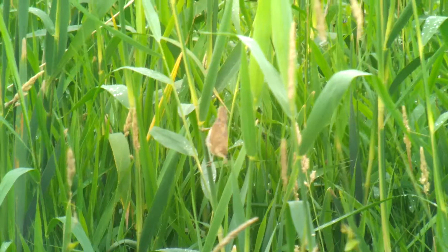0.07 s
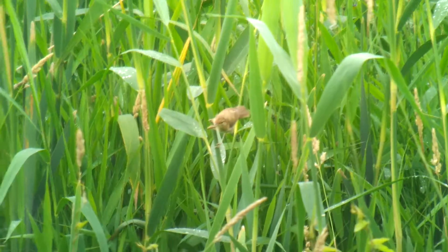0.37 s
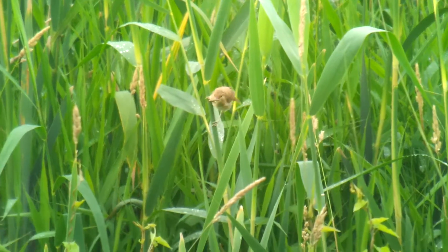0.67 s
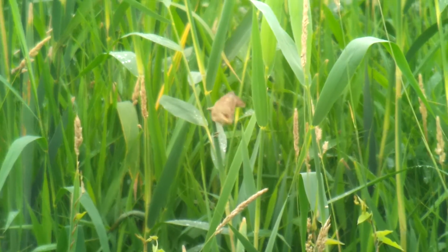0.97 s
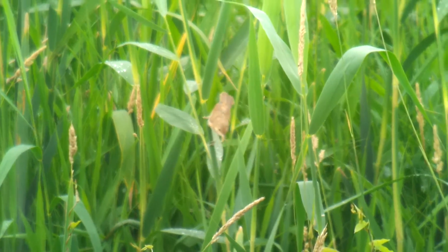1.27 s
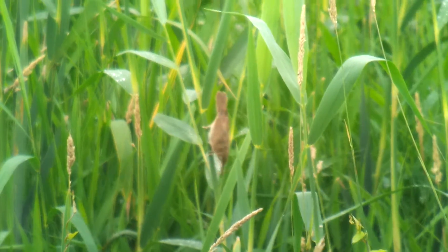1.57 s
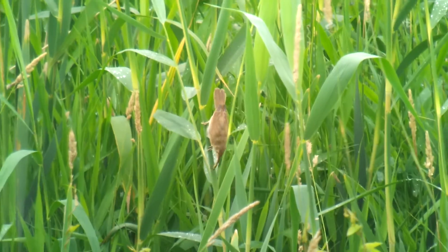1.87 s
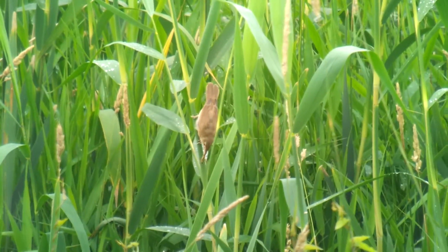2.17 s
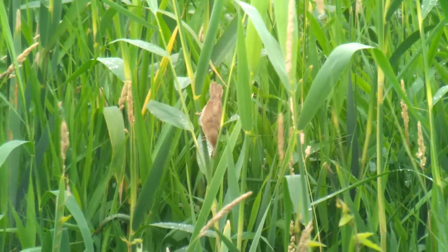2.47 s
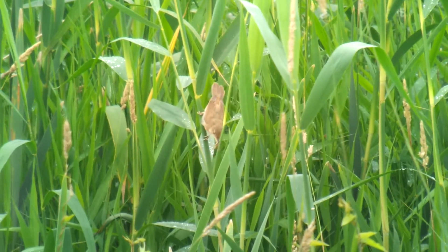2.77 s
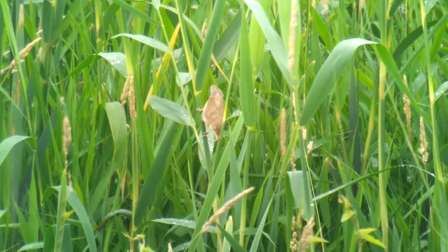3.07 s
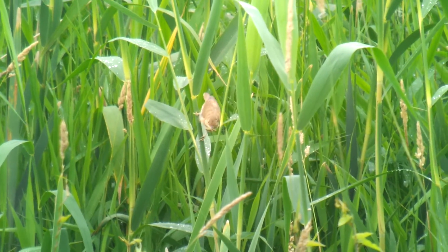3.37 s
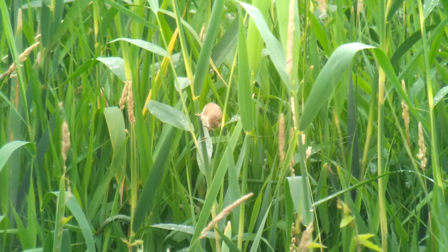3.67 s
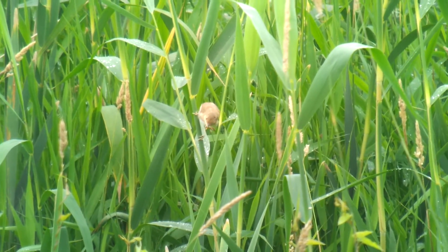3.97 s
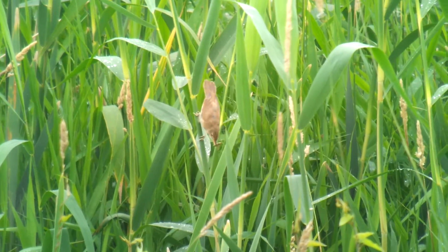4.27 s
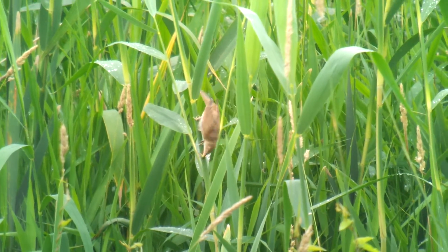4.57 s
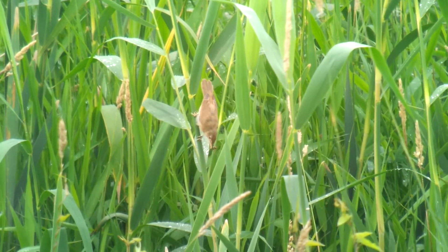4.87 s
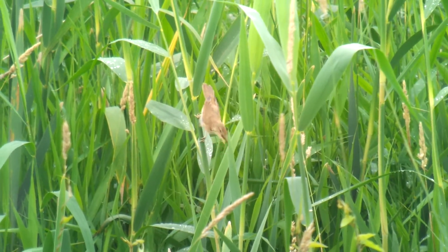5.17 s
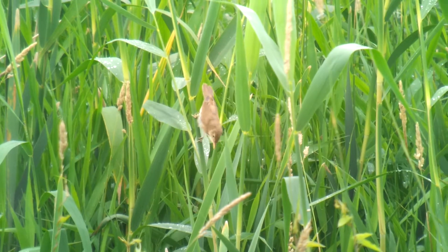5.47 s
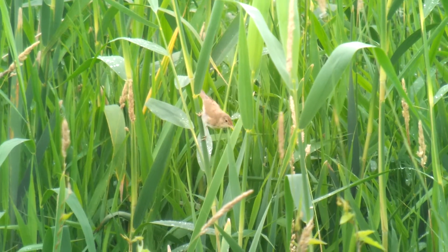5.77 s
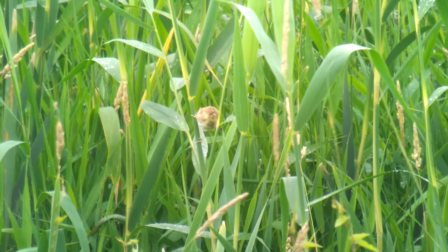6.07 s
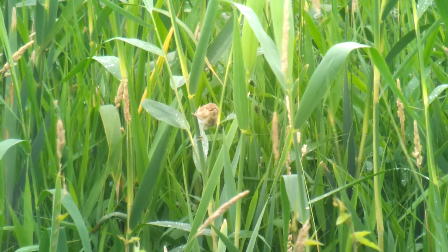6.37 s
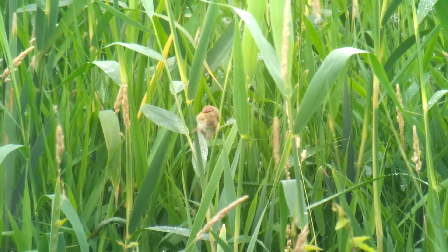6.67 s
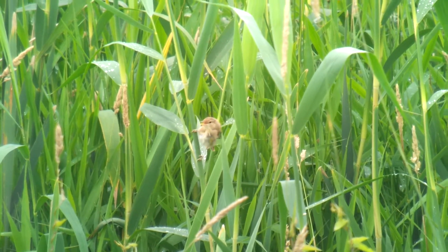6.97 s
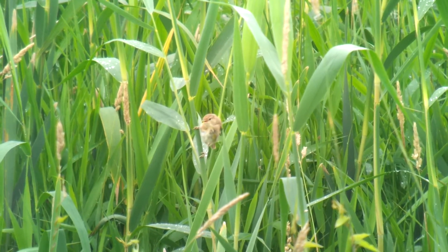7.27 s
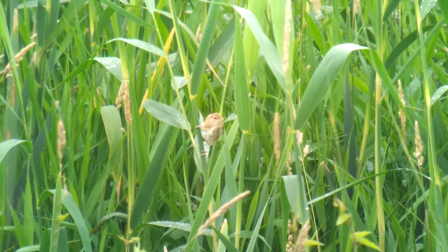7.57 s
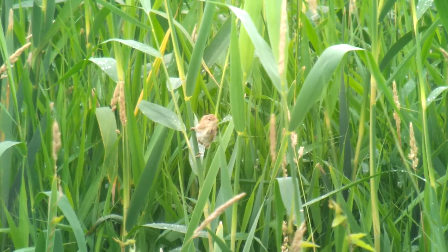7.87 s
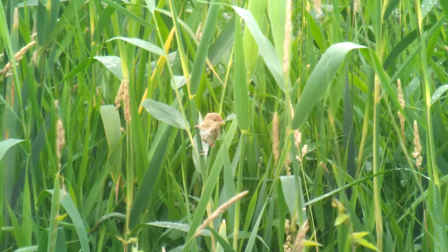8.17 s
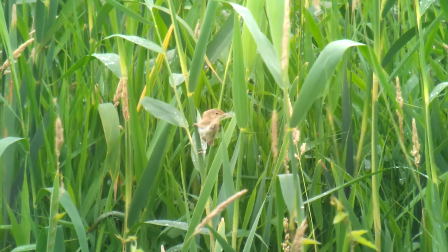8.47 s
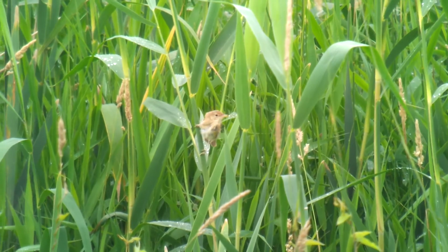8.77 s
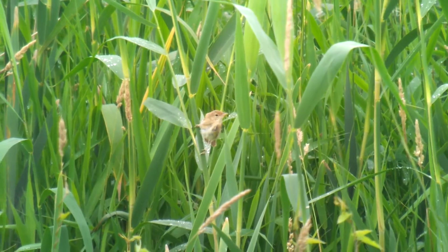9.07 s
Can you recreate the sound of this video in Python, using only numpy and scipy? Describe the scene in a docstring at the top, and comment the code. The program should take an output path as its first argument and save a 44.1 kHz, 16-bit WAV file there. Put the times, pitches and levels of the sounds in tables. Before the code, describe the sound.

A warbler sings a fast, scratchy jumble of chirps, swooping whistles and rattling trills in dense reeds, fading in after a moment of silence. Behind it are thin twitters from distant birds, an even open-air hiss, a slight wind rumble and the faint low hum of a faraway engine. Two tiny, sharp stem cracks stand out, one early and one halfway through. The mono sound is soft, with the singer nearest.

```python
"""A reed warbler chatters in a dense reed bed: whistles, chips, slurs, sawtooth trills and rasps overlap.
Each note is a near-pure syrinx tone swept in pitch; a second vibration shakes it into a rasp.
Farther birds twitter. The reeds hiss and scatter the song, wind rumbles faintly, a distant engine
hums and dry stems snap. Mono, fading in after a short silence."""
import sys
import numpy as np
from scipy import signal
from scipy.fft import rfft, irfft, next_fast_len
from scipy.io import wavfile
from scipy.ndimage import map_coordinates

SR = 44100
rng = np.random.default_rng(int(sys.argv[2]) if len(sys.argv) > 2 else 0)


def digitize_waveform(pressure):
    """Quantize a signal to 16-bit integers and store it at the path in sys.argv[1].

    Rows of a 2-D input are taken as channels; values are limited to [-1, 1].
    """
    field = np.atleast_2d(pressure).T
    bounded = np.clip(field, -1, 1)
    quanta = np.round(bounded * 32767).astype(np.int16)
    wavfile.write(sys.argv[1], SR, quanta)


N = 401751

# reed and open-air hiss: freq_hz, relative_density_db
HISS_SPECTRUM = [(50, -28), (115, -0.5), (155, -3.5), (195, 1.5), (260, -2), (430, -1.5), (620, -5),
                 (880, -3.5), (1200, -10.5), (1700, -6.5), (2300, -15), (4200, -15.5), (8000, -16.5),
                 (12000, -19)]
# wind rumble: freq_hz, relative_density_db
WIND_SPECTRUM = [(10, -9), (22, -7.5), (40, 1.5), (70, 0), (100, -4), (300, -68)]
# wind strength: time_s, level_db
WIND_LEVELS = [(1, -54), (2.9, -57.5), (3.65, -48), (4.2, -58), (7.7, -56), (8.3, -54), (9.1, -57)]
# distant engine: time_s, firing_hz, level_db
ENGINE_CURVE = [(1, 64, -54.5), (1.3, 65, -56), (1.9, 67, -49.5), (2.5, 69, -49), (2.85, 72, -61),
                (3.9, 73, -59.5), (9.1, 74, -66)]
# dry stems cracking: start_s, level_db
STEM_SNAPS = [(.798, -27), (4.5567, -26)]
# low calls: start_s, pitch_hz, level_db, trail_db
LOW_CALL_NOTES = [(1.017, 2586, -49, -58), (2.272, 2660, -51.5, -58)]
# falling slurs: start_s, length_s, end_hz, level_db
FALLING_SLURS = [(1.039, .025, 2780, -58), (1.137, 0.02, 2800, -56), (1.187, 0.063, 2890, -58.5),
                 (1.425, 0.093, 2714, -51), (2.33, 0.016, 3450, -50), (2.47, .014, 3180, -56),
                 (2.508, 0.017, 3000, -55), (2.702, 0.079, 2800, -54), (3.368, 0.011, 3080, -56),
                 (4.338, .016, 2950, -58), (5.697, 0.027, 3230, -53), (5.938, .041, 5320, -56),
                 (6.443, 0.059, 2545, -58), (6.668, 0.05, 2830, -54), (6.701, 0.062, 2790, -54.5),
                 (6.838, 0.034, 2390, -59), (6.687, .04, 4600, -56.5), (7.026, .013, 3230, -50.5),
                 (7.072, .048, 5390, -56.5), (7.163, .014, 3210, -54), (7.58, 0.071, 2340, -56),
                 (7.96, .05, 2550, -57.5), (8.15, 0.027, 2680, -57.5), (8.552, .018, 3620, -58),
                 (8.992, 0.044, 5400, -57.5)]
# rising slurs: start_s, length_s, end_hz, level_db
RISING_SLURS = [(1.235, .048, 3320, -57.5), (1.323, 0.046, 3030, -49), (1.821, .033, 7300, -54),
                (1.835, .025, 6100, -54), (2.037, .014, 3450, -56), (2.155, 0.016, 3450, -55),
                (2.59, 0.037, 3070, -53), (5.046, .018, 4280, -57.5), (6.09, 0.0065, 5650, -44.5),
                (7.3, 0.042, 2610, -57), (8.014, 0.047, 2860, -57.5), (8.093, 0.032, 5100, -51),
                (8.512, 0.056, 2790, -58)]
# held notes, sagging slightly: start_s, length_s, pitch_hz, level_db
HELD_NOTES = [(2.645, .035, 4335, -56), (3.871, 0.045, 4160, -56.5), (4.381, .05, 2810, -61),
              (4.806, .045, 4150, -61), (5.295, 0.075, 3360, -58), (5.425, 0.038, 4360, -53.5),
              (5.55, 0.058, 2826, -57), (6.659, 0.03, 4140, -49.5), (7.441, .25, 2800, -64),
              (8.288, 0.032, 3320, -52), (8.368, 0.077, 2110, -60), (8.447, 0.059, 4220, -56),
              (8.732, .13, 2820, -62)]
# scratchy notes: start_s, length_s, pitch_hz, level_db
RASP_NOTES = [(3.469, .04, 6630, -56.5), (5.684, 0.013, 6100, -50), (5.703, 0.013, 6070, -49),
              (5.957, 0.057, 3740, -55.5), (6.481, 0.03, 5560, -50.5), (6.554, 0.018, 4160, -53),
              (6.639, 0.03, 4230, -53), (7.114, 0.067, 3500, -57.5), (8.272, 0.034, 3550, -55)]
# reedy notes: start_s, length_s, pitch_hz, glide_ratio, level_db
REEDY_NOTES = [(3.296, .055, 4080, 0.11, -58.5), (3.71, 0.09, 6070, .13, -61),
               (5.158, .04, 4450, 0.12, -55.5), (5.243, 0.029, 4800, 0.078, -58),
               (5.321, 0.031, 4750, .1, -56.5), (5.456, 0.085, 3990, -0.046, -53)]
# descending trills: start_s, length_s, start_hz, fade_db, level_db
FALLING_TRILLS = [(1.383, 0.22, 4420, 8, -51), (2.556, 0.16, 4320, 5.5, -51), (3.424, 0.18, 4400, 15, -50),
                  (4.635, 0.21, 4170, 4, -54), (5.536, 0.25, 4000, 11, -51), (5.856, 0.045, 4090, 0, -50.5),
                  (5.913, .13, 4850, 9, -50.5), (6.282, 0.13, 4660, 16, -46.5),
                  (7.932, 0.19, 4400, 12, -47.5)]
# trills on one pitch: start_s, length_s, swing_ratio, fade_db, level_db
RATTLE_TRILLS = [(2.213, 0.18, .22, 8, -43), (4.221, 0.22, .14, 7, -51), (8.848, .229, 0.11, -2, -52)]
# runs of swooping whistles: first_start_s, last_start_s, last_level_db
WHISTLE_RUNS = [(0.895, 1.284, -53), (3.11, 3.244, -58.5), (5.079, 5.35, -56), (7.36, 7.757, -51.5)]
# short arched chips: start_s, pitch_hz, level_db
CHIP_NOTES = [(2.483, 4190, -51), (3.356, 4370, -54), (4.075, 5900, -57), (4.163, 4300, -55),
              (4.564, 4130, -56.5), (6.093, 5290, -47), (6.131, 3450, -53.5), (6.162, 3400, -56),
              (6.188, 3450, -56), (7.865, 4400, -49.5), (8.324, 4520, -52), (8.499, 4500, -53.5),
              (8.668, 4470, -52.5)]
# zigzag notes of the main motif: start_s, level_db
TUMBLE_NOTES = [(0.969, -41), (1.581, -44), (6.925, -41.5), (7.712, -39)]
# swooping whistle: length_fraction, pitch_ratio, gain_db
WHISTLE_CONTOUR = [(0, 1.02, -1), (.16, .76, 0), (.36, 1, 0), (.7, 1.005, 2.5), (1, .99, -3)]
# arched note: length_fraction, pitch_ratio, gain_db
ARCH_CONTOUR = [(0, .92, -10.5), (.7, 1.02, 4), (1, 0.96, -1)]
# zigzag into a loud fall: length_fraction, pitch_ratio, gain_db
TUMBLE_CONTOUR = [(0, 1.33, -7), (.15, 1.08, -22), (.2, 1.33, -12), (.38, 1.08, -8), (.42, 1.3, -19),
                  (.52, 1.14, -5), (.58, 1.06, -16), (.68, 1.01, -3.5), (.85, .96, -2.5), (1, .91, -8)]

HELD_END_RATIO = 1 - .0257


def amp(db):
    """Decibels to gain."""
    return 10 ** (np.asarray(db) / 20)


def clock(length_s):
    """Sample times in seconds."""
    return np.arange(max(int(length_s * SR), 2)) / SR


def curves(rows, at):
    """Later columns of a table, interpolated along the first."""
    knots, *columns = np.transpose(rows)
    return [np.interp(at, knots, column) for column in columns]


def wobble(rate_hz, samples):
    """Smooth random curve."""
    knots = rng.standard_normal(int(samples * rate_hz / SR) + 4)
    return map_coordinates(knots, [np.arange(samples) * rate_hz / SR])


def filtered(x, response):
    """Apply a gain given as a function of Hz."""
    size = next_fast_len(N + SR // 2)
    return irfft(rfft(x, size) * response(np.fft.rfftfreq(size, 1 / SR)), size)[:N]


def noise(spectrum):
    """Coloured noise, rms 1."""
    hz, db = np.transpose(spectrum)
    x = filtered(rng.standard_normal(N), lambda f: amp(np.interp(np.log(f + 1), np.log(hz), db)))
    return x / np.sqrt(np.mean(x ** 2) + 1e-20)


def add(track, start_s, sound):
    """Mix a sound into the track."""
    part = track[max(round(start_s * SR), 0):][:len(sound)]
    part += sound[:len(part)]


def gate(t, edge_fraction):
    """Linear attack and release."""
    progress = t / t[-1]
    return np.clip(np.minimum(progress, 1 - progress) / edge_fraction, 0, 1)


def reed_hiss(level_db=-52):
    """Steady hiss over the reed bed."""
    return amp(level_db) * noise(HISS_SPECTRUM)


def wind():
    """Soft gusts swell a low rumble."""
    level_db, = curves(WIND_LEVELS, np.arange(N) / SR)
    return amp(level_db + wobble(7.6, N)) * noise(WIND_SPECTRUM)


def engine():
    """Only the wavering firing tone carries this far."""
    firing_hz, level_db = curves(ENGINE_CURVE, np.arange(N) / SR)
    phase = 2 * np.pi * np.cumsum(firing_hz + .59 * wobble(8, N)) / SR
    return amp(level_db + wobble(8.1, N)) * np.sqrt(2) * np.sin(phase)


def stem_snaps(crack_hz=9000, crack_t60_s=.0007, fibre_db=-14, fibre_t60_s=.048, highpass_hz=2500):
    """A sharp crack, then briefly tearing fibres."""
    out, t = np.zeros(N), clock(.037)
    crack = amp(-60 * t / crack_t60_s) * np.cos(2 * np.pi * crack_hz * t)
    for start_s, db in STEM_SNAPS:
        fibres = amp(fibre_db - 60 * t / fibre_t60_s) * rng.standard_normal(len(t))
        add(out, start_s, amp(db) * (crack + fibres))
    return filtered(out, lambda f: f ** 2 / (f ** 2 + highpass_hz ** 2))


def reed_scatter(x, gain_db=-9, t60_s=.22):
    """Countless stems return a short, diffuse tail."""
    t = clock(.5)
    tail = rng.standard_normal(len(t)) * amp(-60 * t / t60_s)
    return amp(gain_db) * signal.fftconvolve(x, tail / np.linalg.norm(tail))[:N]


def syrinx(hz, gain, jitter_ratio, shimmer_db=1.5, overtone_db=-27):
    """Bird voice: a near-pure tone, slightly unsteady in pitch and level."""
    unsteady_hz = hz * (1 + jitter_ratio * wobble(886, len(hz)))
    phase = 2 * np.pi * np.cumsum(unsteady_hz) / SR
    tone = np.sqrt(2) * (np.sin(phase) + amp(overtone_db) * np.sin(2 * phase))
    return gain * amp(shimmer_db * wobble(229, len(hz))) * tone


def twitter(count, length_s, centre_hz, log_spread, log_glide, db):
    """Faint notes at random times, pitches and slopes; most fall."""
    out = np.zeros(N)
    draws = np.clip(rng.standard_normal((count, 4)), -1.6, 1.6)
    starts_s = (np.arange(count) + rng.uniform(0, 2, count)) / count * N / SR
    for start_s, (pitch, slope, stretch, offset_db) in zip(starts_s, draws):
        t = clock(length_s * np.exp(.5 * stretch))
        glide = log_glide * (slope - .5) * (t / t[-1] - .5)
        hz = centre_hz * np.exp(log_spread * pitch + glide)
        add(out, start_s, syrinx(hz, amp(db + offset_db) * gate(t, .22), jitter_ratio=.0085))
    return out


def far_birds():
    """Distant ticks and low, high and thin notes."""
    ticks = twitter(460, length_s=.00986, centre_hz=3707, log_spread=.17, log_glide=.251, db=-61)
    low = twitter(45, length_s=.0597, centre_hz=2520, log_spread=.15, log_glide=.0686, db=-67)
    high = twitter(160, length_s=.0356, centre_hz=4104, log_spread=.2, log_glide=.0605, db=-69.5)
    thin = twitter(220, length_s=.018, centre_hz=6390, log_spread=.097, log_glide=.101, db=-66.5)
    return ticks + low + high + thin


def slur(length_s, start_hz, end_hz, db):
    """Pitch glides fast, then levels out."""
    t = clock(length_s)
    hz = end_hz + (start_hz - end_hz) * (1 - t / t[-1]) ** 1.402
    return syrinx(hz, amp(db) * gate(t, .097), jitter_ratio=.015)


def low_calls(note_s=.031, trail_s=.16, trail_ratios=(.905, .96)):
    """A short note trails off into two soft, beating tones just below it."""
    out = np.zeros(N)
    for start_s, hz, db, trail_db in LOW_CALL_NOTES:
        add(out, start_s, slur(note_s, hz, hz * HELD_END_RATIO, db))
        for ratio in trail_ratios:
            tone = slur(trail_s, hz * ratio, hz * ratio * HELD_END_RATIO, trail_db)
            add(out, start_s + note_s / 2, tone * gate(clock(trail_s), .27))
    return out


def slurs(max_drop_hz=1698, drop_shrink_s=.068, rise_start_ratio=.82):
    """Pure notes that fall, rise or hold; longer falls drop less."""
    out = np.zeros(N)
    for start_s, length_s, end_hz, db in FALLING_SLURS:
        drop_hz = max_drop_hz * np.exp(-length_s / drop_shrink_s)
        add(out, start_s, slur(length_s, end_hz + drop_hz, end_hz, db))
    for start_s, length_s, end_hz, db in RISING_SLURS:
        add(out, start_s, slur(length_s, end_hz * rise_start_ratio, end_hz, db))
    for start_s, length_s, hz, db in HELD_NOTES:
        add(out, start_s, slur(length_s, hz, hz * HELD_END_RATIO, db))
    return out


def rasp(length_s, pitch_hz, db, glide_ratio, roughness):
    """A second vibration splits the note into side tones; higher notes shake faster and wider."""
    t, height = clock(length_s), pitch_hz / 4050
    shake_hz = 347.6 * height ** 1.5 * (1 + roughness * wobble(191, len(t)))
    swing_hz = 407 * height ** 2
    shake_phase = 2 * np.pi * np.cumsum(shake_hz) / SR
    hz = pitch_hz * (1 + glide_ratio * t / t[-1]) + swing_hz * np.sin(shake_phase)
    gain = amp(db) * gate(t, .091) * (1 + .58 * np.cos(shake_phase))
    return syrinx(hz, gain, jitter_ratio=roughness / 10)


def rasps():
    """An uneven shake scratches; an even one sounds reedy."""
    out = np.zeros(N)
    for start_s, length_s, hz, db in RASP_NOTES:
        add(out, start_s, rasp(length_s, hz, db, glide_ratio=-.07, roughness=.16))
    for start_s, length_s, hz, glide_ratio, db in REEDY_NOTES:
        add(out, start_s, rasp(length_s, hz, db, glide_ratio, roughness=.025))
    return out


def trill(length_s, start_hz, end_hz, fade_db, db, swing_ratio, rate_hz=61.2):
    """A wavering tone breaks into wider, shorter, slightly unequal down-sweeps."""
    t = clock(length_s)
    progress, cycle = t / t[-1], t * rate_hz % 1
    sharpness = np.minimum(.2 + (t / .075) ** 1.5, 1)
    centre_hz = end_hz + (start_hz - end_hz) * (1 - progress) ** 1.7
    centre_hz *= 1 + .02 * wobble(rate_hz, len(t))
    sweep = swing_ratio * sharpness * np.tanh(5 * (.53 - cycle))
    pulse = np.abs(np.sin(np.pi * cycle)) ** (3.5 * sharpness)
    gain = amp(db - fade_db * progress + wobble(rate_hz, len(t))) * pulse
    return syrinx(centre_hz * (1 + sweep), gain, jitter_ratio=.0095)


def trills(end_ratio=.73, rattle_hz=4400):
    """Quick sweeps run down the scale or rattle on one pitch."""
    out = np.zeros(N)
    for start_s, length_s, hz, fade_db, db in FALLING_TRILLS:
        add(out, start_s, trill(length_s, hz, hz * end_ratio, fade_db, db, swing_ratio=.11))
    for start_s, length_s, swing_ratio, fade_db, db in RATTLE_TRILLS:
        add(out, start_s, trill(length_s, rattle_hz, rattle_hz, fade_db, db, swing_ratio))
    return out


def shaped_note(contour, length_s, hz, db):
    """A practised gesture around a given pitch and level."""
    t = clock(length_s)
    pitch_ratio, swell_db = curves(contour, t / t[-1])
    return syrinx(hz * pitch_ratio, amp(db + swell_db) * gate(t, .056), jitter_ratio=.0088)


def whistle_runs(nominal_period_s=.133, length_s=.058, last_hz=5080, step_hz=45, step_db=2):
    """Evenly spaced whistles, each louder and higher than the one before."""
    out = np.zeros(N)
    for first_s, last_s, last_db in WHISTLE_RUNS:
        count = round((last_s - first_s) / nominal_period_s) + 1
        for to_go, start_s in enumerate(np.linspace(last_s, first_s, count)):
            hz, db = last_hz - step_hz * to_go, last_db - step_db * to_go
            add(out, start_s, shaped_note(WHISTLE_CONTOUR, length_s, hz, db))
    return out


def motifs(arch_lead_s=.042):
    """An arched note leads into a tumbling zigzag; chips are shorter arches."""
    out = np.zeros(N)
    for start_s, db in TUMBLE_NOTES:
        add(out, start_s - arch_lead_s, shaped_note(ARCH_CONTOUR, length_s=.038, hz=4314, db=db - 7))
        add(out, start_s, shaped_note(TUMBLE_CONTOUR, length_s=.054, hz=4820, db=db))
    for start_s, hz, db in CHIP_NOTES:
        add(out, start_s, shaped_note(ARCH_CONTOUR, length_s=.016, hz=hz, db=db))
    return out


def warbler():
    """All notes of the near song."""
    return whistle_runs() + motifs() + slurs() + trills() + rasps() + low_calls()


def scene():
    """Same mix in both channels; far birds scatter more through the reeds."""
    far, near = far_birds(), warbler()
    birds = near + far + reed_scatter(near + 3 * far)
    mono = birds + stem_snaps() + reed_hiss() + wind() + engine()
    return np.array([mono, mono])


def record(dry, silent_until_s=.69, full_at_s=.97, cutoff_hz=11900):
    """Fade-in and brick-wall low-pass."""
    fade = np.interp(np.arange(N) / SR, (silent_until_s, full_at_s), (0, 1))
    return np.array([filtered(channel * fade, lambda f: f < cutoff_hz) for channel in dry])


dry = scene()
out = record(dry)
digitize_waveform(out)
```